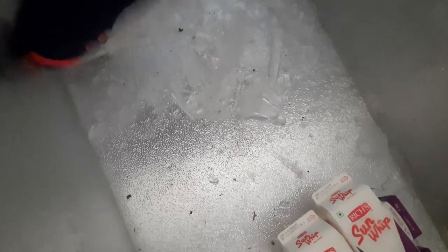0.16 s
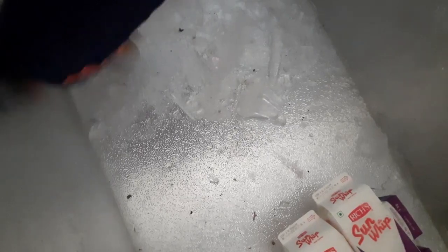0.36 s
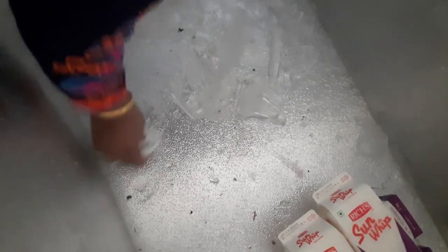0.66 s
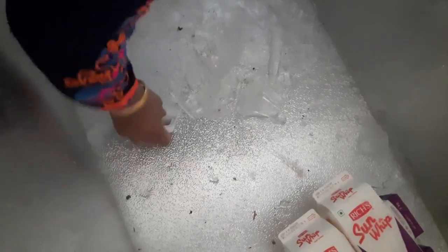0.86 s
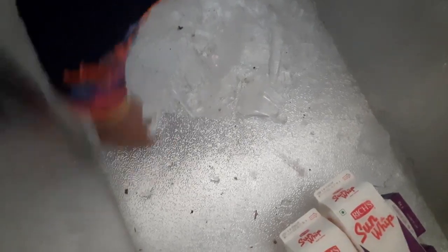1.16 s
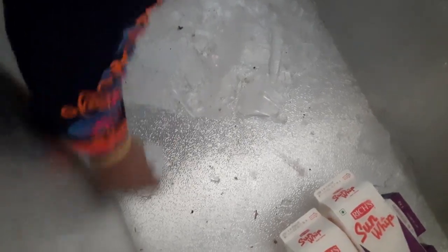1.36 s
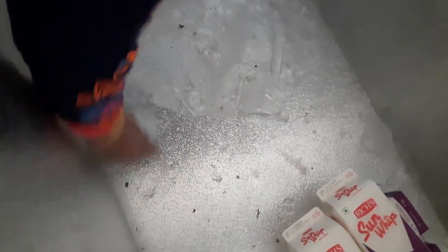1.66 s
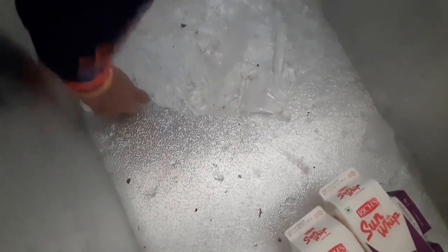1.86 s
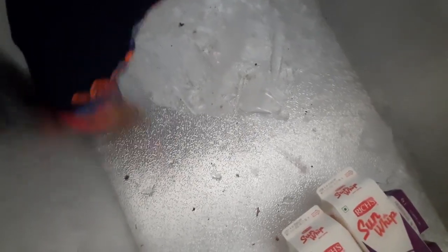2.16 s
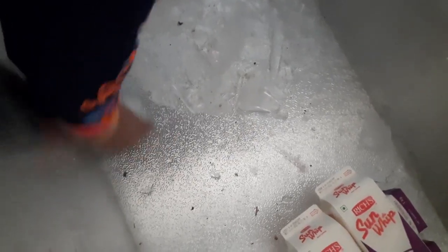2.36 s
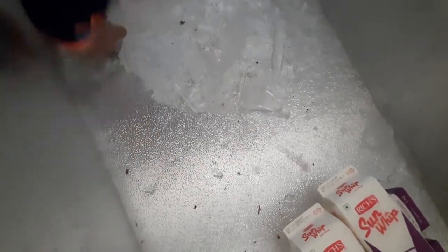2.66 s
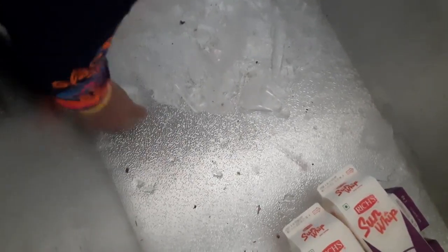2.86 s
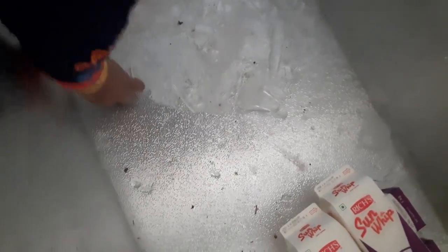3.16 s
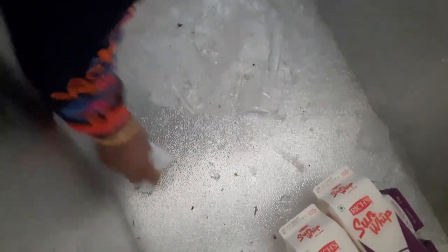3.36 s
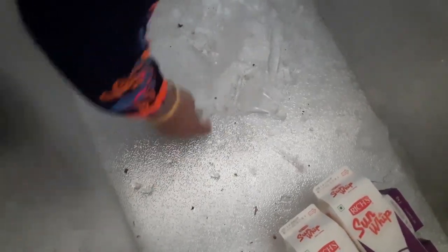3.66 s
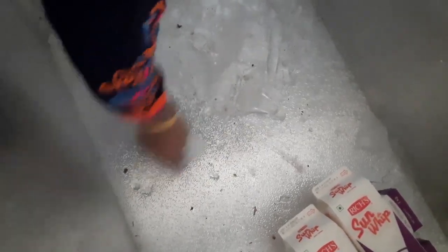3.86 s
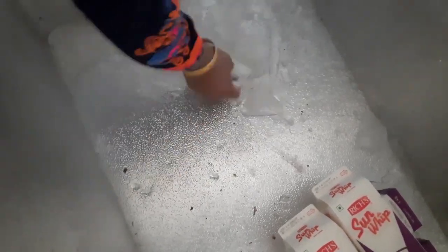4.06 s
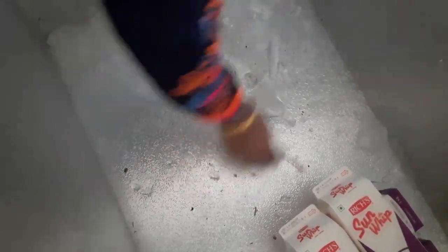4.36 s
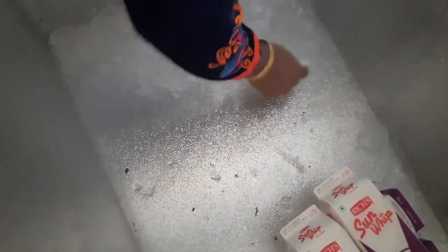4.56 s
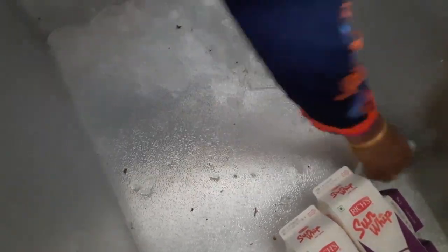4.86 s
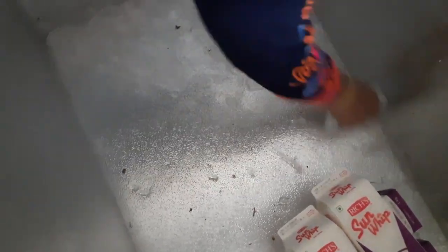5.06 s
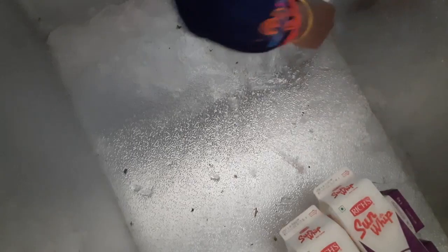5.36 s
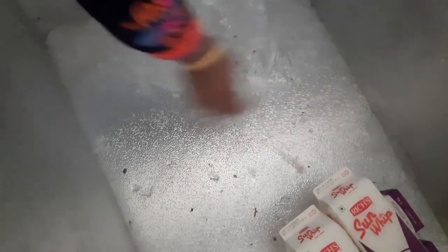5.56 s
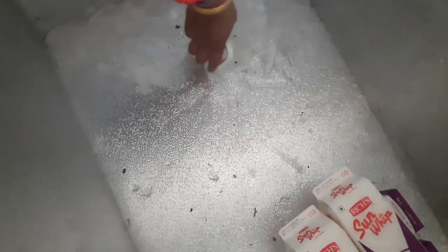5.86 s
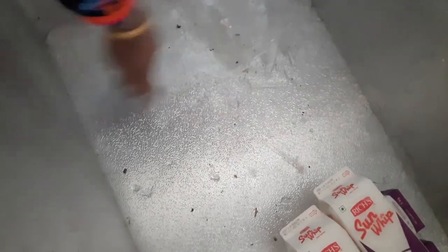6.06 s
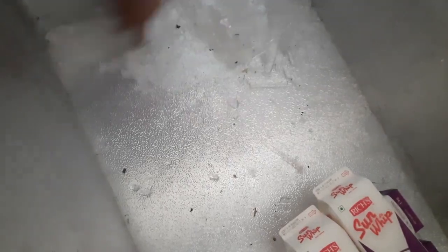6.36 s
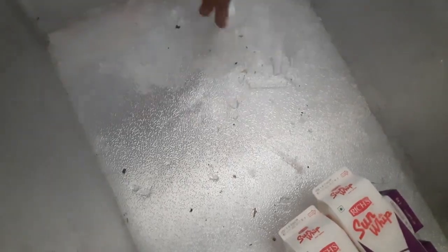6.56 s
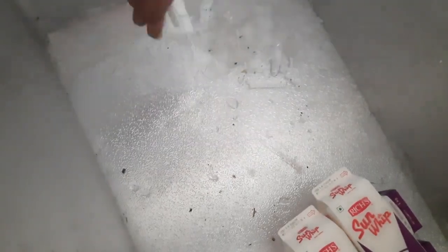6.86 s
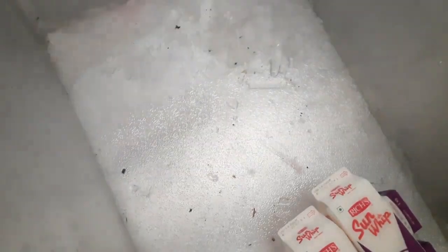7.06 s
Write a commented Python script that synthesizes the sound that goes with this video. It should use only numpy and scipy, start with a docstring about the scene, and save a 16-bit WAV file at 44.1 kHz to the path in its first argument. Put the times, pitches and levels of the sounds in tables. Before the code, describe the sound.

A hand shoves wet ice and frost across a metal freezer floor, with gritty crunching, sharp snaps and hollow lump knocks, heard very close.

```python
"""A hand shoves wet ice and frost over the sheet-metal floor of a chest freezer, close to a two-port microphone.
The frost crushes into dense grains, clicks that each ring a few cycles, and crusts snap in short noise bursts.
Lumps knock and drag on the floor panel, whose low modes ring, and the shoves lean on the cabinet walls.
Sparse echoes give the cabinet a short tail; under it lies the faint hum of the room, filtered noise and a drone."""
import sys
import numpy as np
from scipy import signal
from scipy.fft import rfft, irfft, next_fast_len
from scipy.io import wavfile
from scipy.ndimage import uniform_filter1d, map_coordinates

SR = 44100
rng = np.random.default_rng(int(sys.argv[2]) if len(sys.argv) > 2 else 0)


def transcribe(signal):
    """Save signal, clipped to [-1, 1], as a 16-bit WAV file at the path in sys.argv[1]."""
    frames = np.atleast_2d(signal).T
    limited = np.clip(frames, -1, 1)
    pcm = np.round(limited * 32767).astype(np.int16)
    wavfile.write(sys.argv[1], SR, pcm)


N = 317079
STEP = 32  # samples between points of the slow curves

# modes of the floor panel: (f/Hz, relative level/dB, free t60/s)
PANEL_MODES = [(187.1, -0.5, 0.2), (229, -2, 0.12), (258, -4.5, 0.15), (291.6, -0.5, 0.13),
               (324.7, -3.5, 0.31), (359.6, -5.5, 0.29), (391.7, -4.5, 0.18), (434, -2.5, 0.073),
               (463, -8, 0.14), (521.6, 0.5, 0.086), (581, -3, 0.096), (612.2, -3, 0.22), (698, -8, 0.045),
               (701, 1.5, 0.038), (777, -3, 0.056), (851, -4.5, 0.12), (946, -8.5, 0.22),
               (1214, -25.5, 0.046), (1282, -8, 0.039)]
# crushed grains as the microphone hears them: (f/Hz, relative level per Hz/dB)
FROST_SPECTRUM = [(590, -7), (1000, -1.5), (1360, -3.5), (1510, -4), (2290, -2.5), (3840, -8), (7140, -6.5),
                  (7480, -8), (8480, -18), (9300, -20.5), (12100, -12.5), (15600, -15)]
# one row a shove of the hand, levels relative: (start t/s, length t/s, crushing level/dB, brightness level/dB,
# drag on the panel level/dB, strongest panel ring f/Hz, weight on the cabinet level/dB)
SHOVE_ROWS = [(-0.008,0.05,-20.5,-5.5,-33,644,-43),(0.109,0.055,-18.5,-5.5,-35,374,-25),(0.191,0.046,-36.5,-15,-40,345,-28),(0.249,0.084,-42,2.5,-41,256,-51),(0.498,0.1,-30.5,4.5,-25.5,560,-30),(0.561,0.029,-20,-14,-24.5,256,-22),(0.614,0.063,-19.5,2.5,-20.5,309,-36.5),(0.745,0.056,-21,2.5,-19,316,-23.5),(0.81,0.11,-29.5,5,-25.5,304,-30.5),(0.954,0.084,-41,8.5,-43,283,-53),(1.091,0.035,-24,-6,-18,390,-36),(1.129,0.078,-20.5,5.5,-17.5,586,-25.5),(1.23,0.027,-37.5,-10,-23.5,278,-31),(1.287,0.077,-43.5,6,-39,250,-38),(1.406,0.054,-31,-7,-22,390,-22.5),(1.462,0.087,-18.5,4,-19,686,-24.5),(1.558,0.076,-34.5,1.5,-28.5,271,-35.5),(1.644,0.12,-24,-2,-28,312,-35),(1.815,0.061,-19,1,-21.5,570,-28.5),(1.947,0.063,-31,2.5,-30.5,276,-39.5),(2.044,0.068,-25,-5.5,-17.5,260,-34),(2.166,0.054,-15.5,2.5,-22.5,593,-25.5),(2.216,0.13,-32.5,-6.5,-27,289,-37.5),(2.353,0.027,-33,3,-32.5,578,-42),(2.405,0.061,-26,-5,-24.5,292,-40.5),(2.495,0.17,-20,0,-25,595,-34),(2.711,0.11,-22.5,-1.5,-30,614,-38.5),(2.812,0.12,-28.5,1.5,-19.5,560,-39),(2.969,0.021,-29,4.5,-33.5,600,-26),(3.022,0.047,-15.5,-2.5,-20.5,378,-22),(3.099,0.028,-31,2,-24.5,284,-25),(3.18,0.11,-39.5,-1,-35.5,608,-42.5),(3.437,0.13,-33,4,-27,442,-41.5),(3.493,0.054,-18,0.5,-18,306,-28),(3.601,0.1,-34.5,2,-35,319,-53),(3.736,0.035,-31,-1,-35,289,-41),(3.856,0.13,-26.5,2.5,-21,330,-45),(3.911,0.093,-19.5,1,-20.5,318,-30),(4.001,0.19,-20.5,-2.5,-24,404,-36.5),(4.215,0.038,-25.5,-3,-27,324,-40.5),(4.326,0.1,-32.5,-10,-31.5,463,-44.5),(4.45,0.19,-23,-1.5,-24.5,466,-40),(4.66,0.038,-27.5,2.5,-26,334,-37),(4.714,0.11,-35.5,1.5,-32,557,-48.5),(4.835,0.015,-23,-17,-17,421,-30),(4.883,0.029,-23,-7.5,-27,334,-35),(4.953,0.063,-19.5,0,-29,616,-34),(5.02,0.058,-26,11.5,-23,359,-44.5),(5.087,0.18,-22,-1.5,-27.5,407,-54),(5.255,0.15,-21.5,-0.5,-23,583,-40.5),(5.414,0.095,-27.5,-2.5,-26.5,278.5,-50),(5.545,0.033,-32,-10.5,-36.5,309,-53),(5.683,0.069,-27.5,-2.5,-21.5,302,-30.5),(5.747,0.065,-20.5,4.5,-18,480,-35),(5.919,0.026,-27,11.5,-23.5,539,-32.5),(5.975,0.01,-30.5,-6.5,-33,233,-47),(6.243,0.16,-30,4.5,-37,595,-52),(6.289,0.11,-19.5,-0.5,-23,538,-51),(6.362,0.093,-24,4,-36,540,-42.5),(6.459,0.17,-25.5,8,-32.5,547,-44),(6.511,0.12,-25.5,-5,-26.5,555,-40),(6.627,0.077,-38,5,-33.5,247,-61),(6.971,0.065,-56.5,3.5,-45.5,321,-49),(7.051,0.073,-55,-1,-56,248,-67)]


def amp(db):
    """Gain of a level in dB."""
    return 10 ** (np.asarray(db) / 20)


def evened(x):
    """Scaled to rms 1."""
    return x / np.sqrt(np.mean(x ** 2) + 1e-20)


def read(points, hz):
    """A table over frequency, joined on a log axis."""
    f, value = np.transpose(points)
    return np.interp(np.log(hz + 1), np.log(f + 1), value)


def add(mix, s, sound):
    """Mixes a sound in at a time in seconds."""
    part = mix[round(s * SR):][:len(sound)]
    part += sound[:len(part)]


def along(x):
    """From a slow curve to every sample."""
    return np.interp(np.arange(N), STEP * np.arange(len(x)), x)


def coloured(x, points):
    """Causal filter with the given spectrum (minimum phase)."""
    level_db = np.maximum(read(points, abs(np.fft.fftfreq(4096, 1 / SR))), -80)
    log_gain = np.log(amp(level_db))
    taps = np.fft.ifft(np.exp(np.conj(signal.hilbert(log_gain)))).real[:2048]
    return signal.oaconvolve(x, taps[None], axes=1)[:, :x.shape[1]]


def rung(x, hz, t60):
    """A mode driven by x, keeping the power of a noisy drive."""
    r = amp(-60 / (t60 * SR))
    turn = 2 * np.pi * hz / SR
    drive = np.sin(turn) * np.sqrt(2 * (1 - r * r))
    return signal.lfilter([drive], [1, -2 * r * np.cos(turn), r * r], x)


def clumps(ms, spread_db):
    """Random gain that wanders on the given time scale, as ice catches and lets go."""
    size = max(int(ms / 1000 * SR / STEP), 2)
    slow = rng.standard_normal(N // STEP + 2)
    slow = evened(uniform_filter1d(uniform_filter1d(slow, size), size))
    return np.repeat(evened(amp(spread_db * slow)), STEP)[:N]


def clicks(per_s, spread_db):
    """Sparse clicks of random sign at both ends of the ice heap; a few are large."""
    u = rng.uniform(-1, 1, (2, N)) * SR / per_s
    hit = abs(u) < 1
    out = np.zeros((2, N))
    out[hit] = np.sign(u[hit]) * amp(spread_db * np.minimum(-np.log(abs(u[hit])), 4))
    return evened(out)


def shoves(column, bite_s, arch_db, fall_db_per_s):
    """Power of every shove (one row each): it bites, arches, lets go, and loose bits rattle on more quietly."""
    rows = np.array(SHOVE_ROWS)
    t = np.arange(0, N, STEP) / SR - rows[:, :1]
    length = np.maximum(rows[:, 1:2], .01)
    after = np.maximum(t - length, 0)
    bite = np.clip(t / bite_s, 0, 1)
    # hardest at 0.59 of the length
    arch = amp(-arch_db * (2 * (np.clip(t / length, 0, 1) - 0.59)) ** 2)
    rattle = amp(-10 - 208 * after)  # falls 208 dB/s
    release = np.maximum(amp(-fall_db_per_s * after), rattle)
    return (amp(rows[:, [column]]) * bite * arch * release) ** 2 + 1e-14


def loudness_db(power):
    """Summed level of all shoves together."""
    return along(10 * np.log10(power.sum(0)))


def leading(power, column):
    """A column of the shoves, weighted toward the loudest at each moment."""
    return along(np.array(SHOVE_ROWS)[:, column] @ power / power.sum(0))


def hum():
    """Steady low room noise and microphone hiss, with a narrow resonance on noise as a faint wavering drone."""
    # room and microphone floor: (f/Hz, relative level per Hz/dB)
    floor_spectrum = [(18, -32), (30, -8.5), (75, -1.5), (144, -23), (277, -17), (1080, -40.5),
                      (3510, -46.5), (7300, -42.5), (9000, -45), (15600, -63.5)]
    drone = amp(-51.5) * rung(rng.standard_normal(N), hz=57.9, t60=1.5)
    return drone + amp(-53) * evened(coloured(rng.standard_normal((2, N)), floor_spectrum))


def cabinet_air(ends, wet_db=-6.5):
    """One end of the heap is nearer the left port, the other the right; sparse echoes follow, dying band by band."""
    # decay of the cabinet air: (f/Hz, t60/s)
    air_decay = [(100, 0.54), (420, 0.24), (1100, 0.21), (3000, 0.2), (8000, 0.2), (15000, 0.21)]
    # one echo of random sign in every 20 samples
    taps = np.zeros((2, SR // 2))
    at = np.arange(60, SR // 2 - 20, 20) + rng.integers(0, 20, (2, (SR // 2 - 61) // 20))
    np.put_along_axis(taps, at, rng.choice([-1., 1.], at.shape), 1)
    hz, t, bands = signal.stft(taps, SR, nperseg=256)
    fading = bands * amp(-60 * t / read(air_decay, hz)[:, None])
    tails = signal.istft(fading, SR, nperseg=256)[1]
    tails = amp(wet_db) * tails / np.linalg.norm(tails[0])
    echoes = signal.fftconvolve(ends.sum(0)[None], tails, axes=1)[:, :N]
    # the lag to the far port, about 16 samples, shifts as the ice moves about
    lags = [uniform_filter1d(16 * clumps(ms=70.0, spread_db=3.0), 64) for _ in ends]
    late = np.array([map_coordinates(end, [np.arange(N) - lag], order=3) for end, lag in zip(ends, lags)])
    return (ends + late[::-1] + echoes) / np.sqrt(2 + 2 * amp(wet_db) ** 2)


def favoured_db(hz, spot_hz, boost_db, octave_db):
    """The spot touched on the panel drives the modes near one pitch best."""
    off = np.log2(hz / spot_hz)
    return boost_db * np.exp(-(off / 0.06) ** 2) - octave_db * abs(off)


def dragged(modes, per_s, level_db, spot_hz=None, free=1):
    """Small bumps under the moving ice shake the modes; free is the share of the ring time left under the hand."""
    gains = []
    for hz, db, _ in modes:
        spot_db = 0 if spot_hz is None else favoured_db(hz, spot_hz, boost_db=7.0, octave_db=3.0)
        gains.append(amp(db + spot_db))
    bumpy = clumps(ms=10., spread_db=1.5)
    catch = bumpy * amp(level_db) / np.sqrt(sum(g ** 2 for g in gains))
    jolts = 0.28 * clicks(per_s / 4, spread_db=1.5)  # larger bumps shake all modes at once
    out = np.zeros((2, N))
    for gain, (hz, _, t60) in zip(gains, modes):
        bumps = clicks(per_s, spread_db=2.0) + rng.choice([-1, 1]) * jolts
        out += rung(bumps * catch * gain, hz, free * t60)
    return out


def leaned_walls():
    """The weight of each shove shakes the low modes of the whole cabinet walls."""
    # modes of the walls: (f/Hz, relative level/dB, t60/s)
    wall_modes = [(56, -12, .2), (87.7, 3, 0.37), (118, 4, 0.08)]
    lean = shoves(column=6, bite_s=0.043, arch_db=7, fall_db_per_s=244.5)
    return dragged(wall_modes, per_s=240, level_db=loudness_db(lean))


def dragged_panel():
    """Ice dragged over the floor panel rings its modes, strongest near the pitch of the leading shove."""
    drag = shoves(column=4, bite_s=0.01, arch_db=2.5, fall_db_per_s=396.5)
    spot_hz = leading(drag, column=5)
    return dragged(PANEL_MODES, per_s=260, level_db=loudness_db(drag), spot_hz=spot_hz, free=0.66)


def knocks():
    """A blow rings the panel; the ice resting on it changes how long the ring lasts."""
    # lumps landing on the panel: (t/s, relative level/dB, strongest ring f/Hz, share of the free ring time)
    landings = [(0.002, -13, 593, 0.44), (0.016, -10, 580, 0.54), (0.124, -10, 950, 0.12),
                (0.147, -11, 765, 0.42), (0.165, -11, 450, 0.38), (0.174, -5, 359, 1.14),
                (0.509, -7, 594, 0.6), (0.571, -4.5, 415, 0.29), (0.664, -3.5, 572, 0.59),
                (0.77, -16, 316, 0.36), (1.1, 1.5, 378, 0.39), (1.414, 1.5, 380.5, 0.63),
                (1.725, -2.5, 372, 0.82), (1.848, -5, 616, 0.61), (1.876, -7, 302, 1.14),
                (2.064, -12, 265, 0.62), (2.076, -5.5, 306, 0.58), (2.098, -4, 356, 0.62),
                (2.192, -6.5, 612, 0.74), (2.218, -4, 625, 0.5), (2.374, -7, 605, 0.71),
                (2.426, -6, 307, 0.51), (2.442, -7, 594, 0.38), (2.463, -10.5, 287, 0.55),
                (2.545, -5.5, 554, 1.1), (2.988, -9, 676, 0.3), (3.059, -5.5, 491, 1.06),
                (3.233, -7, 700, 0.4), (3.451, -18, 298, 0.27), (3.512, -9, 438, 0.19),
                (3.535, -4.5, 330, 1.06), (3.762, -17.5, 306, 0.95), (3.827, -9.5, 566, 0.79),
                (3.851, 0, 339, 0.6), (4.108, -8, 374, 0.24), (4.184, -12.5, 322, 0.59),
                (4.344, 5, 454, 0.44), (4.358, -6.5, 519, 0.26), (4.394, -3.5, 565, 0.3),
                (4.404, -3, 481, 0.464), (4.467, -7, 464, 0.7), (4.629, -7.5, 559, 1.1),
                (4.851, -13, 488, 0.15), (4.8866, 2.5, 734, 0.25), (4.896, -4, 403, 0.46),
                (4.907, -0.5, 722, 0.48), (4.922, -6, 331, 0.52), (4.977, -10, 924, 0.45),
                (4.988, -3.5, 1310, 0.96), (5.015, -7, 440, 0.5), (5.064, -12, 390, 0.41),
                (5.104, -6, 1274, 1), (5.136, -5, 390, 0.46), (5.184, -8.5, 885, 0.42),
                (5.694, 1.5, 314, 0.38), (5.93, -8, 178, 0.44), (6.25, -17, 595, 0.59),
                (6.309, -6, 775, 0.6), (6.315, -3.5, 520, 1.2), (6.384, -16, 250, 1.4)]
    out = np.zeros((N, 2))
    t = np.arange(SR // 4)[:, None] / SR
    hz, mode_db, t60 = np.transpose(PANEL_MODES)
    waves = np.sin(2 * np.pi * hz * t) * np.minimum(t / 0.0019, 1)
    chances = rng.standard_normal((len(landings), 3, len(PANEL_MODES)))
    for (s, db, spot_hz, free), luck in zip(landings, chances):
        spot_db = favoured_db(hz, spot_hz, boost_db=16.5, octave_db=6.5)
        # a random sign for each mode, and a random level for each mode and side
        sizes = np.sign(luck[0] + .4) * amp(mode_db + spot_db + 2.8 * luck[1:])
        blow = waves * amp(-60 * t / (max(free, .1) * t60)) @ sizes.T
        add(out, s, amp(db - 16.0) * blow / blow[:700].std(0))  # sized by its first 16 ms
    return out.T


def snaps():
    """A sharp crack and a burst of grains, with one shard ringing above the rest."""
    # crusts of frost snapping: (t/s, relative level/dB, shard ring f/Hz)
    cracks = [(0.1232, -4.5, 1830), (0.165, -9.5, 2020), (0.2695, -27, 7200), (0.5054, -18, 5600),
              (0.5684, -8, 6400), (0.63, -11, 1830), (0.7688, -13, 3850), (0.8522, -17, 2600),
              (0.9305, -12, 5500), (1.095, -13, 2060), (1.141, -21, 6980), (1.1761, -5.5, 7300),
              (1.254, -11.5, 1550), (1.4108, -13, 2080), (1.5141, -5, 6800), (1.636, -18, 6880),
              (1.705, -11, 5170), (1.8087, -14.5, 2540), (1.867, -7.5, 2900), (2.0527, -25.5, 2100),
              (2.1586, -19, 5030), (2.1794, -11.5, 2570), (2.3727, -13, 7500), (2.4367, -13, 2300),
              (2.524, -6, 4960), (2.5523, -4.5, 2780), (2.637, -7, 2500), (2.7627, -16, 2220),
              (2.8994, -3.5, 1660), (2.989, -8, 4800), (3.023, -6.5, 2330), (3.114, -15, 5960),
              (3.1747, -23.5, 6540), (3.2065, -17, 3170), (3.2353, -21.5, 3220), (3.268, -17, 6750),
              (3.3172, -25, 5000), (3.453, -23, 7000), (3.506, -12, 2270), (3.826, -29, 2140),
              (3.8492, -16.5, 2240), (3.944, -4.5, 2260), (4.0765, -22.5, 3060), (4.126, -7.5, 6800),
              (4.167, -7.5, 2440), (4.2285, -15, 2400), (4.343, -21.5, 2350), (4.47, -12, 5900),
              (4.6299, -8.5, 6900), (4.789, -19, 2470), (4.8517, -25, 1400), (4.888, -17, 2250),
              (4.9127, -13.5, 2260), (4.9655, -18, 1730), (5.034, -11, 7300), (5.061, -8, 6570),
              (5.5142, -18.5, 6440), (5.691, -17.5, 1660), (5.7395, -10.5, 7240), (5.926, -18, 2750),
              (6.128, -36.5, 7200), (6.2503, -15, 6720), (6.2898, -17.5, 3000), (6.308, -5, 1940)]
    plain, shards = np.zeros((N, 2)), np.zeros((N, 2))
    t = np.arange(2000) / SR
    # fast crack, slower grains, 1.1 ms rise
    envelope = (amp(-60 * t / 0.046) + 0.32 * amp(-60 * t / 0.15)) * np.minimum(t / 0.0011, 1)
    for (s, db, hz), noise in zip(cracks, rng.standard_normal((len(cracks), 2, 2000))):
        burst = amp(db) * noise * envelope
        add(plain, s, burst.T)
        add(shards, s, rung(burst, hz, 20.0 / hz).T)
    unit = np.linalg.norm(coloured(np.eye(1, 2048), FROST_SPECTRUM))
    return amp(-11) * coloured(plain.T, FROST_SPECTRUM) / unit + amp(-16.5) * shards.T


def crunch(per_s=700, cycles=12.1, spread_db=0.5, count=24):
    """Each breaking grain rings a few cycles at a pitch set by its size."""
    # coarsest grains, under 1.8 kHz, against the rest: (t/s, level/dB)
    coarse_levels = [(0, -3.5), (0.5, 1), (1.2, 1), (2.0, -0.5), (2.5, -10.5), (3.0, -0.5), (3.9, 0),
                     (4.6, 0.5), (4.98, 8), (5.07, 8), (5.17, 9.5), (5.5, -4), (5.8, 1.5), (6.4, 1),
                     (7.1, 8.5)]
    power = shoves(column=2, bite_s=0.011, arch_db=3.5, fall_db_per_s=505.5)
    bright = leading(power, column=3)
    coarse = np.interp(np.arange(N) / SR, *np.transpose(coarse_levels))
    ticks = 0.21 * clicks(per_s=200, spread_db=1.0)  # crisp breaks that sound at every pitch
    out = np.zeros((2, N))
    for hz in np.geomspace(700, 16000, count):
        share = np.clip(np.log2(hz / 2500) / 0.94, 0, 1)  # small grains follow the brightness
        grains = clicks(per_s * np.sqrt(hz / 4000), spread_db)
        train = (grains + rng.choice([-1, 1]) * ticks) * clumps(ms=20., spread_db=1.4)
        out += np.sqrt(hz) * rung(train, hz, cycles / hz) * amp(share * bright + (hz < 1800) * coarse)
    # small collapses start at once and die away, their power by 30 dB in 36 ms
    fade = amp(-60 / (0.036 * SR))
    collapses = signal.lfilter([1], [1, -fade], clicks(per_s=90, spread_db=2.0)[0] ** 2)
    bursts = evened(np.sqrt(1 + 0.8 * evened(collapses))) * clumps(ms=5., spread_db=1.5)
    return evened(coloured(out, FROST_SPECTRUM)) * bursts * amp(loudness_db(power))


def scene():
    """All ice sounds pass the cabinet air; the hum is added after it."""
    panel = dragged_panel() + knocks()
    ice = crunch() + snaps() + panel + leaned_walls()
    return cabinet_air(ice) + hum()


def record(dry):
    """Deep bass is cut; stereo width and balance depend on frequency; peaks overload; then the band limit."""
    # balance: (f/Hz, left minus right level/dB)
    balance = [(60, -3.5), (500, -2), (1170, -3), (2740, -1), (4190, -2.5), (6400, -5.5), (7800, -12),
               (8600, 4.5), (15000, 1)]
    # gain of the left-right difference: (f/Hz, level/dB)
    width = [(60, -34), (250, -3), (1400, -1.5), (4000, 1), (8000, -3.5), (15000, -6)]
    size = next_fast_len(N)
    hz = np.fft.rfftfreq(size, 1 / SR)
    bass_cut = (hz / 48) ** 6 / (1 + (hz / 48) ** 6)
    left, right = rfft(dry, size) * bass_cut
    mid = (left + right) / 2
    side = (left - right) / 2 * amp(read(width, hz))
    tilt = amp(read(balance, hz) / 2)
    ports = irfft(amp(2.0) * np.array([(mid + side) * tilt, (mid - side) / tilt]), size)[:, :N]
    ports = np.clip(ports, -.84, .84)  # the loudest peaks overload
    band_limit = signal.firwin(1023, 15780, window=("kaiser", 9), fs=SR)  # low-pass, edge in Hz
    return signal.oaconvolve(ports, band_limit[None], "same")


dry = scene()
out = record(dry)
transcribe(out)
```